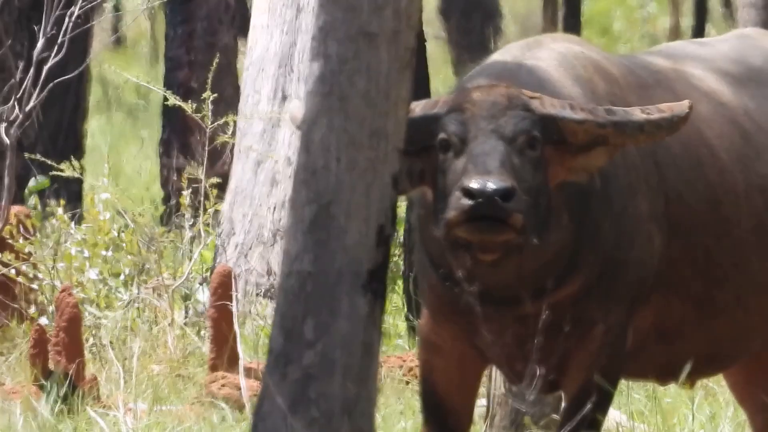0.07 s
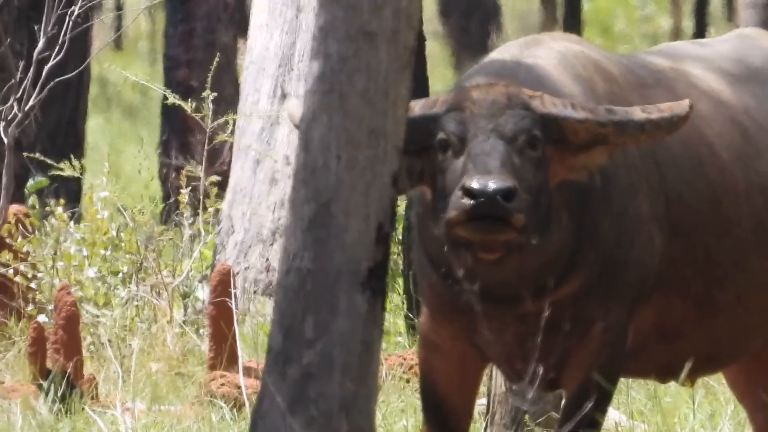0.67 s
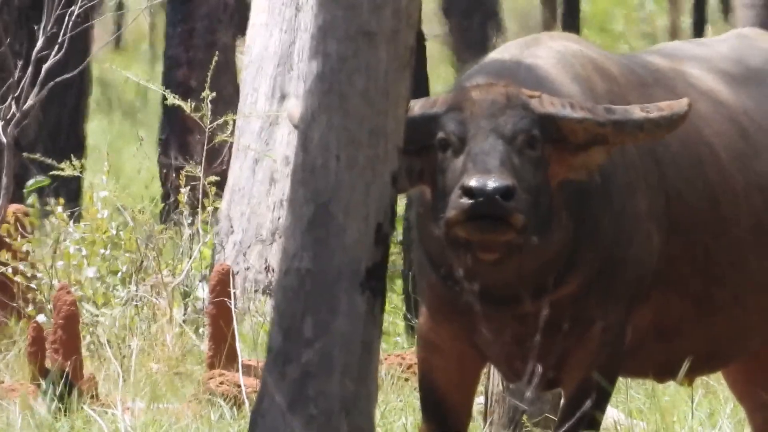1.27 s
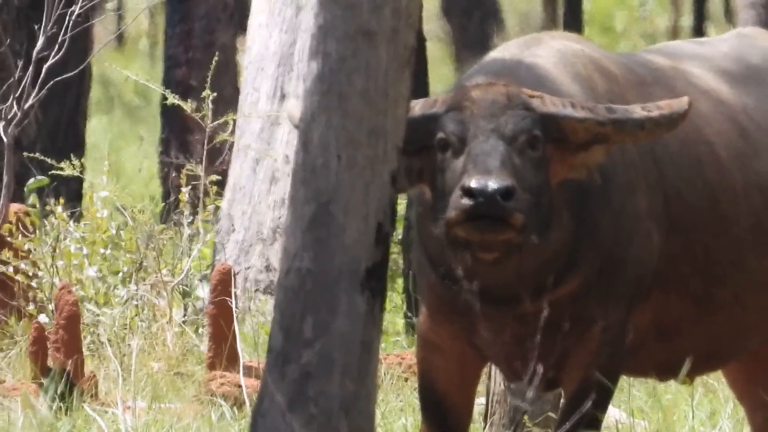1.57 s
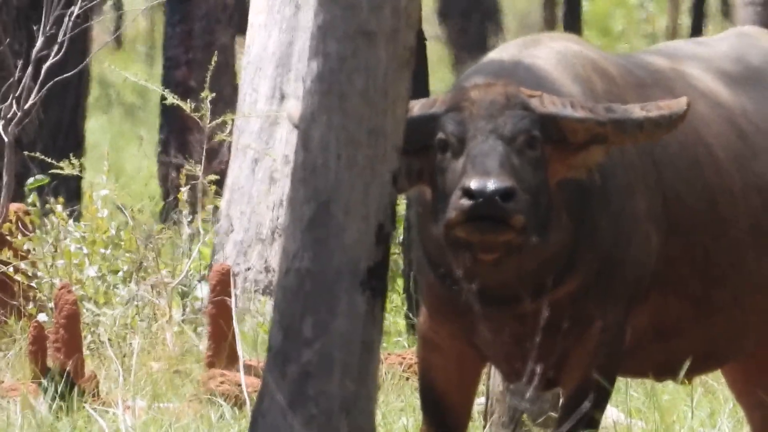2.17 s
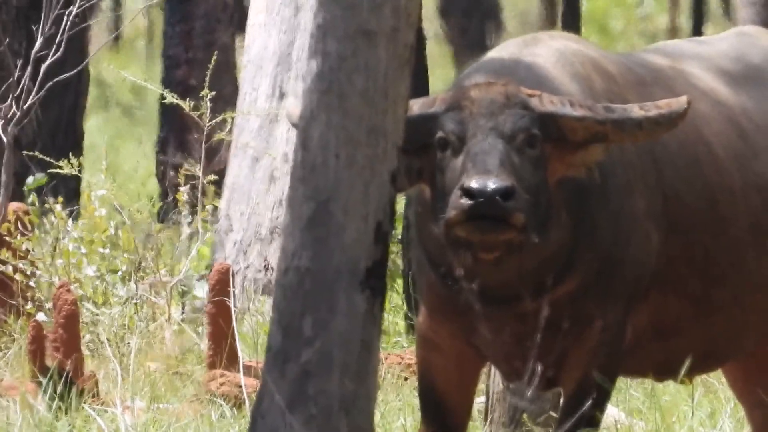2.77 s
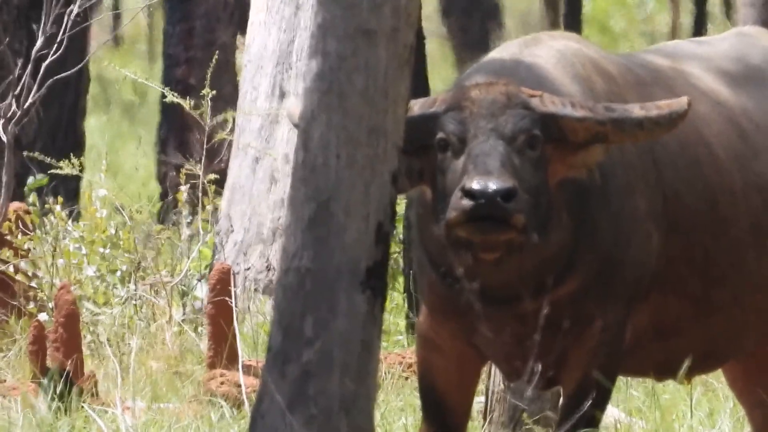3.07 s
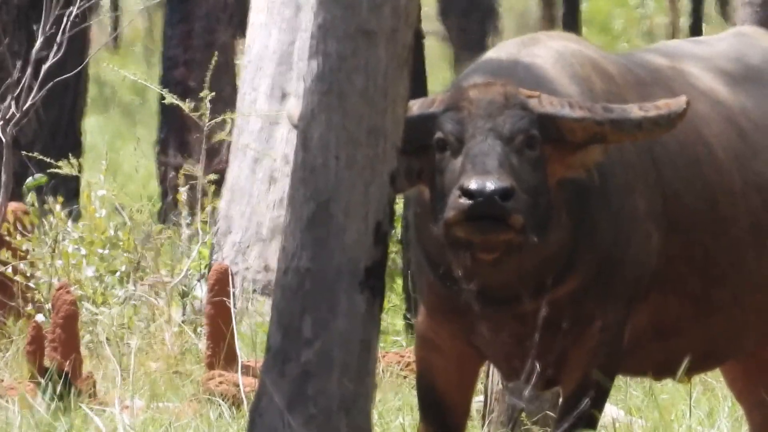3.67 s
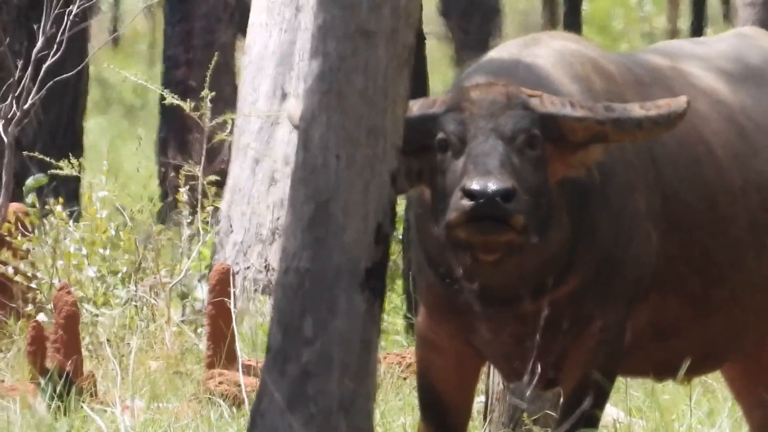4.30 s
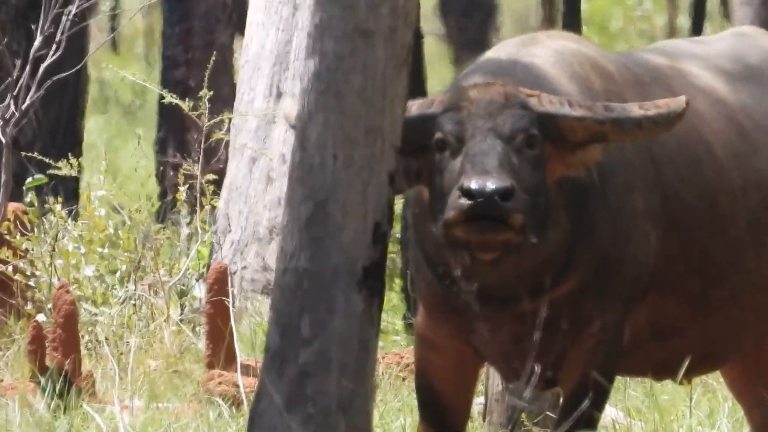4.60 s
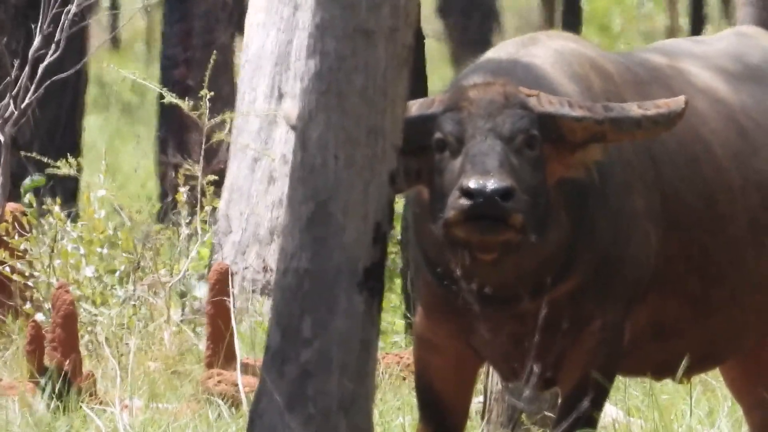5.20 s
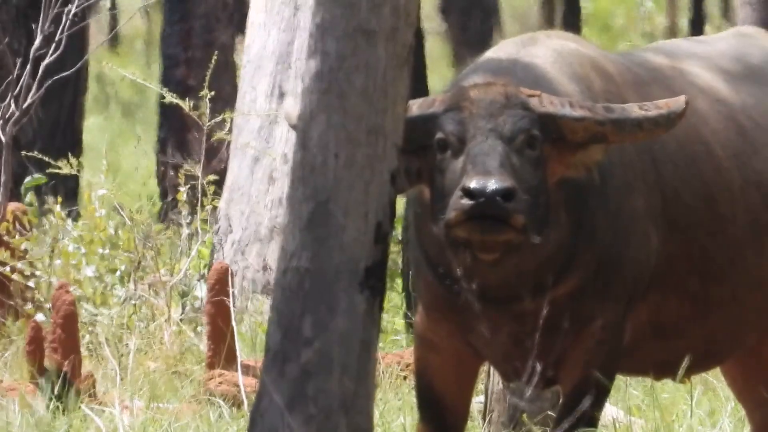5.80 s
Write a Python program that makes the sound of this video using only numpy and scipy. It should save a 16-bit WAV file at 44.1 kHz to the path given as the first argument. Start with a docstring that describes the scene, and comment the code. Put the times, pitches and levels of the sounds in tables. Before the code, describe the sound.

Harsh, raspy squawks from several birds stand out in quiet woodland, each one short and rising, many ending in a squeal. A first run of calls gives way to a brief pause, then a second run, a longer pause and a last quick flurry. The trees add a slight echo. A faint high cicada hiss and a soft hush of air continue throughout, with a very faint far hoot underneath.

```python
"""A few birds squabble in open woodland, their harsh squawks overlapping in bouts.
Each squawk is a fluttering, raspy membrane tone that climbs and often breaks upward into a squeal.
Leaves and trunks scatter the calls. Behind them cicadas click and hiss high up, over a bed of
quiet air with a faint far hoot, one low sinking tone and a few soft bumps on the microphone."""
import sys
import numpy as np
from scipy import signal
from scipy.fft import rfft, irfft, next_fast_len
from scipy.io import wavfile
from scipy.ndimage import map_coordinates

SR = 44100
rng = np.random.default_rng(int(sys.argv[2]) if len(sys.argv) > 2 else 0)


def inscribe(sig):
    """Save sig as 16-bit PCM at rate SR to the path in sys.argv[1].

    A 1-D sig is mono; a 2-D sig holds one channel per row.
    Samples are clipped to [-1, 1] before scaling.
    """
    pcm = np.round(np.clip(np.atleast_2d(sig).T, -1, 1) * 32767)
    wavfile.write(sys.argv[1], SR, pcm.astype(np.int16))


N = 266805
TIME = np.arange(N) / SR

# Cue list, one squawk a row: (start [s], length [s], start pitch [Hz], climb [Hz/s], top pitch [Hz],
#   source level [dB], swell [dB], crest [share of length], overtone slope [dB/octave], flutter [Hz],
# The squeal it breaks into: (length [s], start pitch [Hz], end pitch [Hz], source level [dB],
#   overtone slope [dB/octave], ring [dB])
SQUAWK_CUES = [ (-.25, .18, 900, 1200, 1600, -35, 10, .9, 0, 131, 0.7, 5, (0.0434, 1900, 2060.5, -22, -6.5, 0)),
               (0.334, .29, 900.5, 1100, 1670, -30.5, 13, 0.98, -.5, 142.5, 0.71, 4.5, (0.0856, 2360, 2820, -19.5, -28, 12.5)),
               (.48, 0.25, 910, 1197, 1483, -37, 8, 0.51, 0, 136.2, 0.59, 6.5, (.03, 2171, 2398, -29, -11, 0)),
               (.81, .246, 1008, 1050, 1500, -41, 20, 0.97, 1.3, 135, .5, 9.5, (.077, 2350, 2620, -24, -28, 8.5)),
               (1.088, 0.23, 910, 950, 1139, -39, 20, 0.88, -.6, 127.3, .42, 7.5, None),
               (1.349, 0.32, 823, 1810, 1662, -40, 15.5, .9, -1.1, 135.9, 0.63, 8, None),
               (1.856, .27, 902, 1750, 1705, -39.5, 11, 0.94, -0.53, 125, 0.64, 6, None),
               (1.931, 0.2, 909.5, 1801, 1400, -43, 11, 1, -1.2, 134.1, 0.62, 11, None),
               (2.765, .25, 850, 2298, 1620, -36.5, 13.5, 0.92, .5, 135.7, 0.54, 4.5, (0.08, 2351, 2335, -25.5, -15, -1)),
               (2.839, 0.27, 809, 1649, 1500, -32.5, 13.5, .9, -1, 138.8, .6, 6, (.026, 2180, 2230, -20, -20, 0)),
               (3.08, .205, 1042, 1540, 1660, -33, 7.5, 0.97, .5, 135.8, .45, 8, (0.08, 2460, 2787, -20.5, -23, 5)),
               (3.219, .19, 949, 1704, 1700, -44.5, 8, 0.98, 3, 130.3, 0.94, 0, (.018, 2096, 2338, -34.5, -7, 0)),
               (3.72, .248, 897.5, 2000, 1780, -37, 13, 1, 0, 132.9, .6, 5.5, (0.0843, 2560, 2460, -23.5, -15, -0.5)),
               (3.869, .29, 881, 780, 1597, -34, 15, 1, -0.03, 127.1, .42, 6, None),
               (4.161, 0.26, 981, 901, 1360, -49, 6, 0.87, 3, 138.2, 0.67, 8.5, (.055, 2333, 2450, -29.5, -17.5, 0)),
               (4.32, .188, 907, 1497, 1640, -34.5, 11, 1, .7, 125, 0.63, 7.5, None),
               (5.57, .225, 829, 2199, 1750, -43, 5.5, 1, 3.5, 113, 0.94, 3, (.038, 2200, 2478, -29.5, -9, -4)),
               (5.82, 0.17, 955, 2510, 1490, -39, 7, 1, -0.1, 138.9, 0.64, 8.5, (.05, 2478, 2543, -25.5, -20, -1)),
               (5.879, 0.17, 930, 3003, 1808, -34.5, 17, 1, -1, 136.8, 0.65, 9, None), ]
# Steady resonances of the throat: (frequency [Hz], gain [dB])
THROAT_EQ = [(380, -45), (600, -17), (850, 1), (1150, 3), (1700, 5), (2500, 4), (3000, 4), (3900, 10),
             (4700, 10), (5700, 9), (7000, 3), (9000, -4), (11500, -14), (15000, -28)]
# The bill's resonance falls to meet the climbing pitch: (pitch [Hz], resonance [Hz])
BILL_RESONANCE = [(950, 4530), (1100, 4600), (1250, 4650), (1400, 3600), (1650, 2880), (2300, 2800)]
# Tone colour of the cicada chorus: (frequency [Hz], relative level [dB])
CICADA_SPECTRUM = [(3820, -49), (6500, -15.5), (7300, -13), (8350, -2), (9050, -2), (9830, -0.5),
                   (10300, 0.5), (12400, -23.5), (13600, -54.5), (13700, -73), (14000, -74)]
# Tone colour of still air: (frequency [Hz], relative level [dB])
AIR_SPECTRUM = [(20, -16), (60, -28), (100, -24.5), (194, -5.5), (270, -14), (450, -14.5), (700, -11.5),
                (1000, -11), (1400, -9.5), (2200, -13.5), (3300, -3.5), (4900, -4.5), (7000, -6.5),
                (9500, -37), (15000, -89.5)]
# Background level: cicada hiss and air dip after loud squawks, then slowly recover:
#   (time [s], relative level [dB])
BACKGROUND_LEVEL = [(.3, -38.5), (.85, -45.5), (1.74, -42.5), (2.25, -39.5), (2.8, -40.5), (3.55, -43.5),
                    (4.65, -41.5), (5.55, -39.5)]
# Soft low bumps on the microphone: (time [s], level [dB])
MIC_BUMPS = [(.535, -59), (.6, -63), (3.32, -70)]


def birds(perches=3):
    """Squawks coloured by the throat; each perch has its own paths through the trees."""
    out = 0
    for perch in range(perches):
        voice = sum(squawk(cue) for cue in SQUAWK_CUES[perch::perches])
        out = out + woodland(colour(voice, THROAT_EQ)[None])
    return out


def squawk(cue, break_s=.021, release_s=.038, release_db=22.5, fade_s=.015):
    """One call: it climbs, may break upward into a squeal, and dies quickly."""
    start, length, *climb, flutter_hz, rasp, bill_db, squeal = cue
    held = length + (break_s + squeal[0] if squeal else 0)
    sounding = (TIME >= start) & (TIME <= start + held + release_s)
    t = TIME[sounding] - start
    contour = climb_contour(t, length, *climb)
    if squeal:
        morph = np.clip((t - length) / break_s, 0, 1)
        contour = (1 - morph) * contour + morph * squeal_contour(t - length - break_s, *squeal)
    hz, db, slope = contour
    decay_db = release_db * np.maximum(t - held, 0) / release_s
    fades = np.clip(np.minimum(t, held + release_s - t) / fade_s, 0, 1)
    out = np.zeros(N)
    out[sounding] = syrinx(hz, slope, flutter_hz, rasp, bill_db) * undb(db - decay_db) * fades
    return out


def climb_contour(t, length, start_hz, climb_hz_per_s, top_hz, db, swell_db, crest, slope_db,
                  rush_s=.03, attack_s=.034):
    """Pitch, level and overtone slope of the harsh part: a steady climb, then a rush to the top."""
    t = np.minimum(t, length)
    rush_hz = top_hz - start_hz - climb_hz_per_s * length
    hz = start_hz + climb_hz_per_s * t + rush_hz * np.exp((t - length) / rush_s)
    arch_db = db - swell_db * (1 - t / (crest * length)) ** 2
    dull_attack = 5 * np.exp(-t / attack_s)  # dB per octave
    return np.array([hz, arch_db, slope_db - dull_attack])


def squeal_contour(t, length, start_hz, end_hz, db, slope_db, ring_db,
                   ring_hz=2542, ring_width_hz=52, sag_db=1):
    """Pitch, level and overtone slope of a squeal: a nearly pure glide, shaped by a narrow resonance."""
    progress = np.clip(t / length, 0, 1)
    hz = start_hz + (end_hz - start_hz) * progress ** 1.3
    ring = ring_db * np.exp(-((hz - ring_hz) / ring_width_hz) ** 2)
    return np.array([hz, db - sag_db * progress ** 2 + ring, np.full(len(t), slope_db)])


def syrinx(aim_hz, slope, flutter_hz, rasp, bill_db, bill_width_hz=550, hollow_db=3.5):
    """A membrane tone swung in pitch and strength by a fast flutter, roughened by uneven cycles."""
    size = len(aim_hz)
    hz, squeal = register_break(aim_hz)
    low_register = 1 - squeal
    rough = rasp * (1 - .8 * squeal)  # in the squeal the membrane swings more evenly
    flutter = np.sin(phase_of(flutter_hz * (1 + .1014 * rough * wander(89.8, size))))
    vibrato = (.071 * low_register + .029 * squeal) * flutter
    jitter = rough * (.048 * wander(700, size) + .0249 * wander(120, size))
    pitch = hz * (1 + vibrato + jitter)
    phase = phase_of(pitch)
    bill_hz = np.interp(aim_hz, *np.transpose(BILL_RESONANCE))
    breath = .752 * rough
    tone = np.zeros(size)
    for k in range(1, 13):
        # turbulence smears every overtone into a band around it
        smear = breath * (wander(650, size) + 1j * wander(650, size))
        partial = np.imag((1 + smear) * np.exp(1j * k * phase))
        partial /= np.sqrt((1 + np.mean(abs(smear) ** 2)) / 2)
        # an overtone flares as the flutter sweeps it through the bill's resonance; below lies a hollow
        flare = bill_db * np.exp(-((k * pitch - bill_hz) / bill_width_hz) ** 2)
        hollow = hollow_db * np.exp(-((k * hz - .61 * bill_hz) / bill_width_hz) ** 2)
        gain = undb(slope * np.log2(k) + low_register * (flare - hollow))
        tone += gain * partial * (k * hz < .4 * SR)
    tremolo = 1 + .24 * (1 - .32 * squeal) * flutter
    shimmer = np.exp(.14 * rough * wander(300, size))
    return tone * unit(tremolo * shimmer)


def register_break(hz, break_hz=1930, width_hz=260, leap=.2023):
    """Near the break the membrane flips at random between registers; gives pitch and squeal share."""
    unstable = np.exp(-((hz - break_hz) / width_hz) ** 2)
    flips = np.tanh(3 * wander(260, len(hz)))
    squeal = 1 / (1 + np.exp((break_hz - hz) / 90))
    return hz * (1 + leap * unstable * flips), squeal


def woodland(voice, leaves_t60_s=.029, trunks_t60_s=.13, tail_t60_s=.74):
    """Leaves scatter the treble at once, trunks add centred echoes, the deeper wood a faint wide tail."""
    t = TIME[:SR]

    def reflections(noise, t60_s, onset):
        """Decaying noise with an energy of 1."""
        return unit(noise * undb(-60 * t / t60_s) * onset) / np.sqrt(SR)

    leaf_noise, tail_noise = rng.standard_normal((2, 2, SR))
    leaves = reflections(leaf_noise, leaves_t60_s, onset=t > .001)
    trunks = reflections(rng.standard_normal(SR), trunks_t60_s, onset=t > .003)
    tail = reflections(tail_noise, tail_t60_s, onset=1 - np.exp(-t / .012))
    leaves = colour(leaves, [(1000, 0), (2500, 1.5), (4500, 3.5), (9000, 10.5)])
    tail = colour(tail, [(1000, 3.01), (2600, 3), (5000, .996), (9000, 9)])
    reverb = undb(-9) * (leaves + trunks) + undb(-20) * tail
    direct = colour(voice, [(1000, -1.5), (2500, -2.5), (4500, -6.5), (9000, -6.5)])
    return direct + signal.fftconvolve(voice, reverb, axes=1)[:, :N]


def cicadas(group_hz=50.1, trim_db=4):
    """A cicada's tymbals buckle in quick groups of clicks, over the even hiss of others further off."""
    cycle = phase_of(group_hz * (1 + .004 * wander(4.96, N)))
    clicks = np.cos(cycle / 2) ** 2 * np.cos(2 * cycle) ** 4  # group envelope times click train
    hiss = colour(stereo_noise(.06), [(3000, -60.5)] + list(CICADA_SPECTRUM))
    accents = 1.35 * undb(2 * wander(16, N))
    background_db = np.interp(TIME, *np.transpose(BACKGROUND_LEVEL))
    return unit(hiss * (1 + accents * clicks)) * undb(background_db + trim_db)


def air(trim_db=-9.5):
    """Soft outdoor hush that wavers slightly; it dips and recovers with the background level."""
    hush = unit(colour(stereo_noise(.41), AIR_SPECTRUM))
    background_db = np.interp(TIME, *np.transpose(BACKGROUND_LEVEL))
    return hush * undb(background_db + trim_db + .7 * wander(5.23, N))


def far_hoot(db=-64.5):
    """A faint far hoot: a narrow band of noise that pulses unevenly."""
    band = colour(stereo_noise(.8), [(650, -58.5), (800, -2), (835, 3), (870, -12.5), (1050, -40)])
    return unit(band) * undb(db + 4.1 * wander(18, N))


def far_glide(start_s=5.16, length_s=.25, from_hz=480, to_hz=320, peak_db=-66):
    """A very faint, low tone sinks once in the distance."""
    progress = np.clip((TIME - start_s) / length_s, 0, 1)
    hz = (from_hz + (to_hz - from_hz) * progress) * (1 + .08 * wander(90, N))
    arch = 2 * np.sqrt(progress * (1 - progress))
    return undb(peak_db) * arch * np.sin(phase_of(hz))


def mic_bumps(width_s=.018):
    """Brief low rumbles on the microphone."""
    envelope = sum(undb(db) * np.exp(-((TIME - at_s) / width_s) ** 2) for at_s, db in MIC_BUMPS)
    rumble = colour(stereo_noise(.7), [(20, -6), (70, 5), (250, -8), (600, -21), (2000, -70)])
    return envelope * unit(rumble)


def undb(db):
    """Decibels to gain."""
    return 10 ** (np.asarray(db) / 20)


def unit(x):
    """Scale to rms 1."""
    return x / np.sqrt(np.mean(x ** 2))


def phase_of(hz):
    """Running phase of an oscillator, in radians."""
    return 2 * np.pi * np.cumsum(hz) / SR


def colour(x, points):
    """EQ along a curve of (frequency [Hz], gain [dB]) points."""
    hz, db = np.transpose(points)
    size = next_fast_len(x.shape[-1] + 4096)
    bin_hz = np.maximum(np.fft.rfftfreq(size, 1 / SR), 1)
    gain = undb(np.interp(np.log(bin_hz), np.log(hz), db))
    return irfft(rfft(x, size) * gain, size)[..., :x.shape[-1]]


def wander(rate_hz, size):
    """Smooth random modulation, spread near 1, changing about rate_hz times a second."""
    place = np.arange(size) * rate_hz / SR
    return map_coordinates(rng.standard_normal(2048), [place + 2], order=2, mode="wrap")


def stereo_noise(correlation):
    """Left and right white noise: wide at correlation 0, mono at 1."""
    mid, side = rng.standard_normal((2, N))
    return np.sqrt(1 + correlation) * mid + np.sqrt(1 - correlation) * np.array([side, -side])


def scene():
    """Birds up front among the trees, over a bed of cicadas, air and faint low sounds."""
    return birds() + cicadas() + air() + far_hoot() + far_glide() + mic_bumps()


def record(dry, ceiling=.95, cutoff_hz=15100):
    """A soft clip rounds the loudest peaks and a steep low-pass cuts the top of the treble."""
    rounded = dry / (1 + (abs(dry) / ceiling) ** 10) ** (1 / 10)
    return signal.sosfilt(signal.ellip(8, .2, 70, cutoff_hz, fs=SR, output="sos"), rounded)


dry = scene()
out = record(dry)
inscribe(out)
```